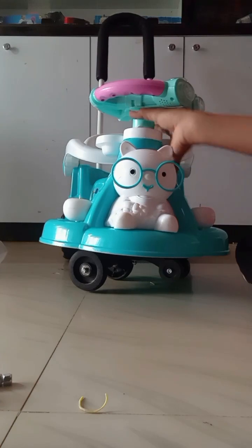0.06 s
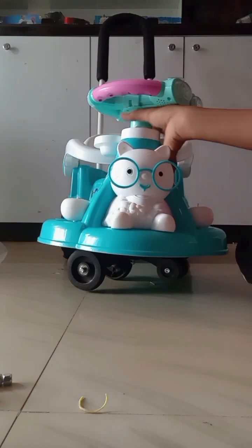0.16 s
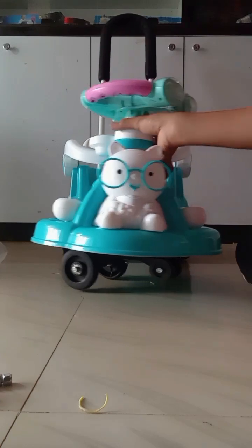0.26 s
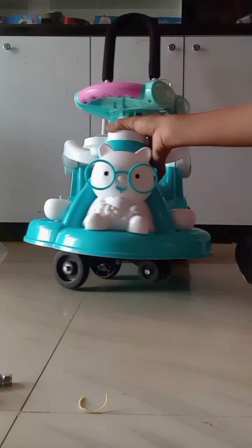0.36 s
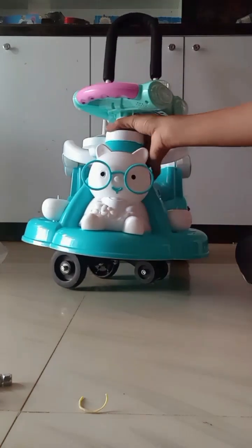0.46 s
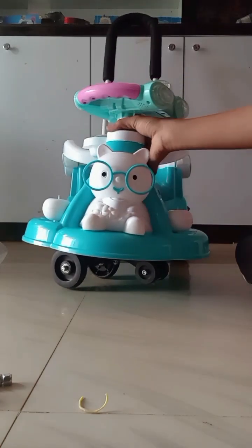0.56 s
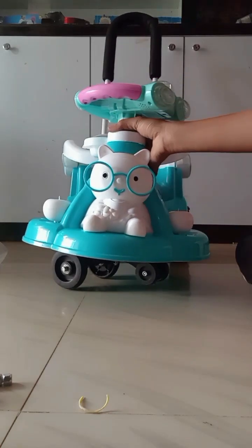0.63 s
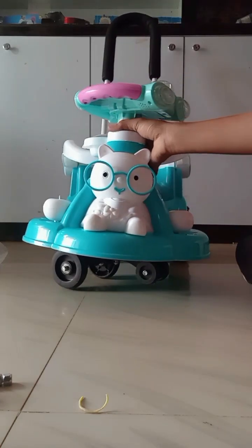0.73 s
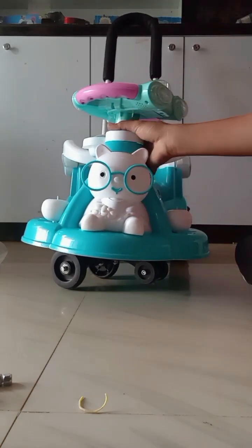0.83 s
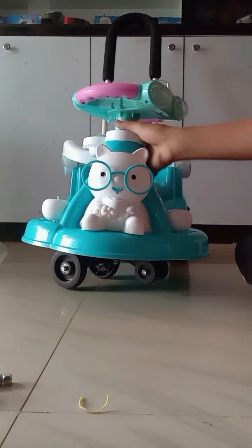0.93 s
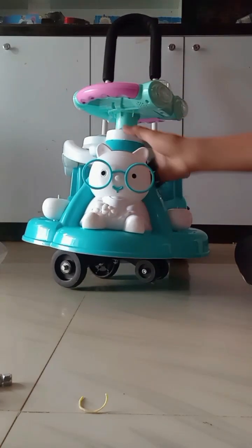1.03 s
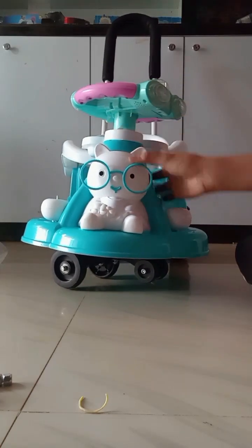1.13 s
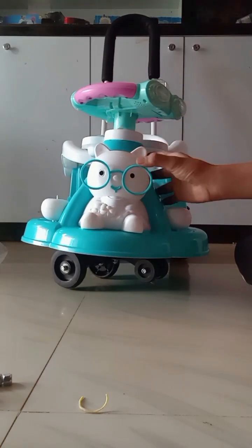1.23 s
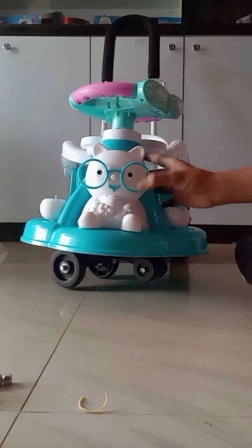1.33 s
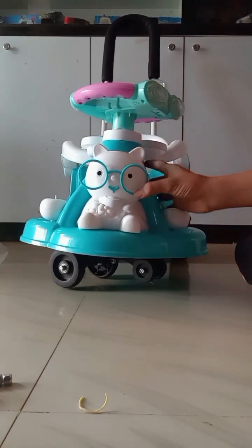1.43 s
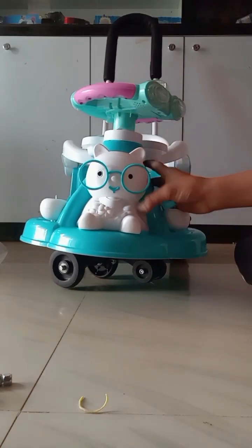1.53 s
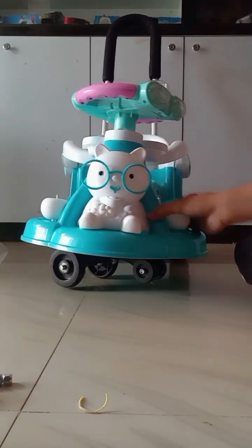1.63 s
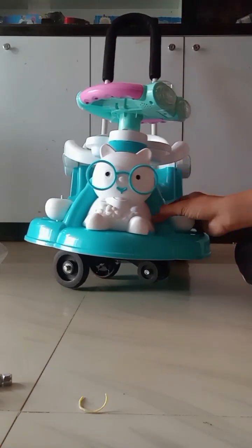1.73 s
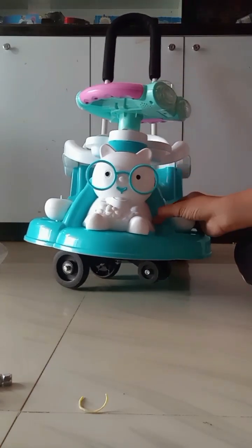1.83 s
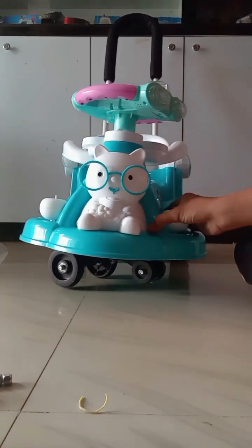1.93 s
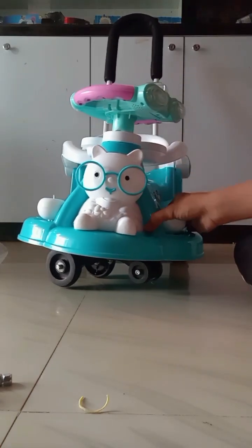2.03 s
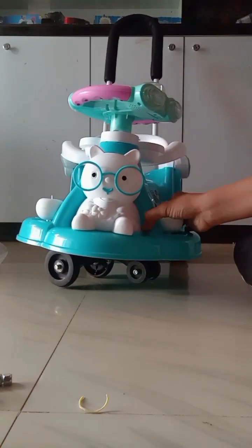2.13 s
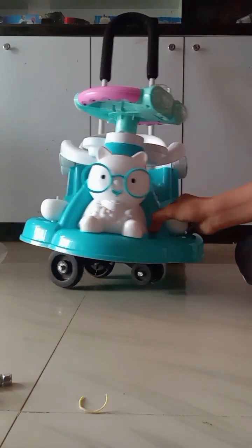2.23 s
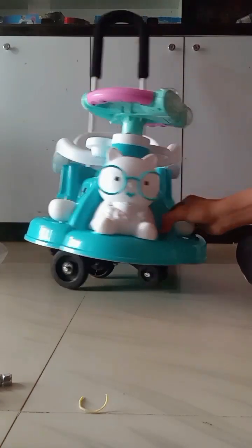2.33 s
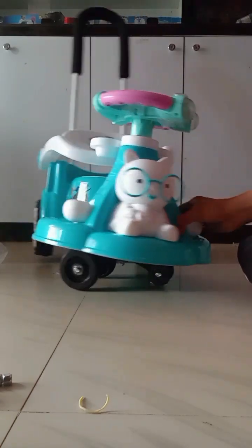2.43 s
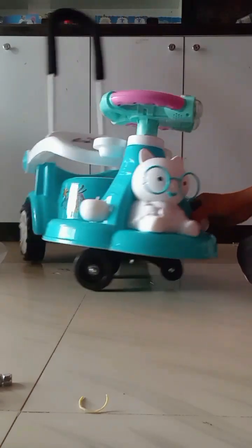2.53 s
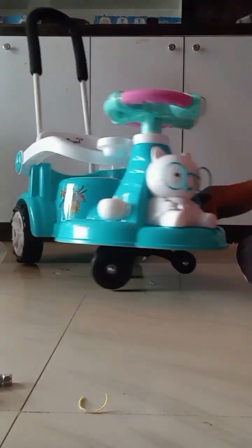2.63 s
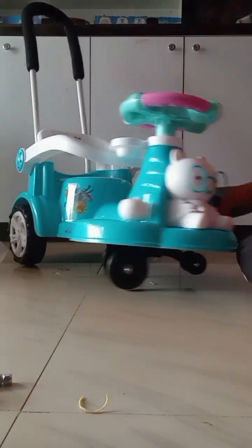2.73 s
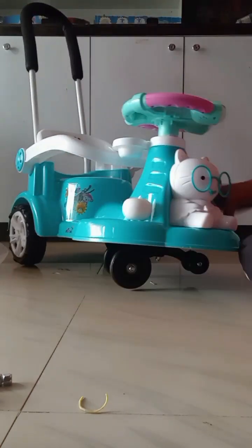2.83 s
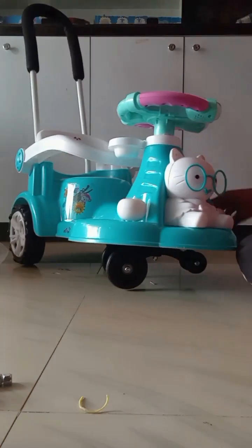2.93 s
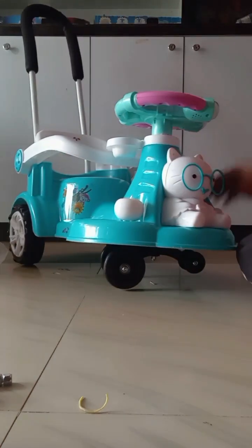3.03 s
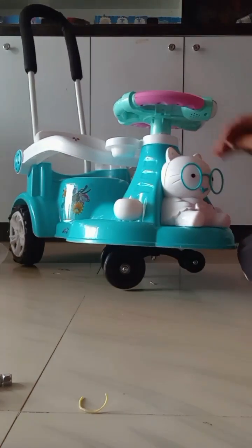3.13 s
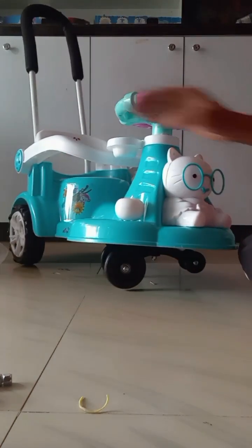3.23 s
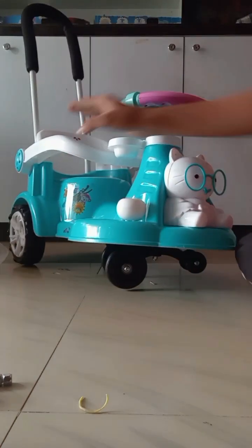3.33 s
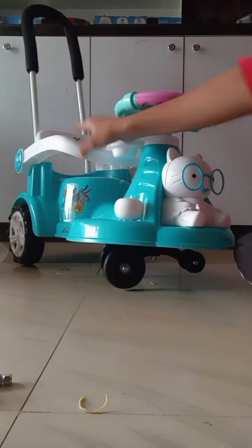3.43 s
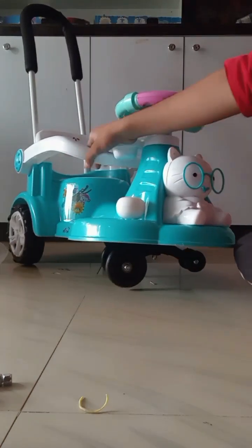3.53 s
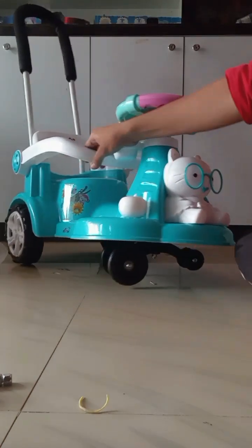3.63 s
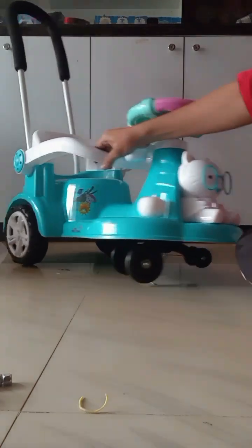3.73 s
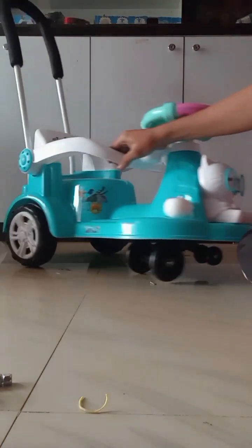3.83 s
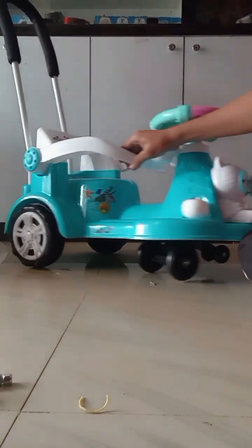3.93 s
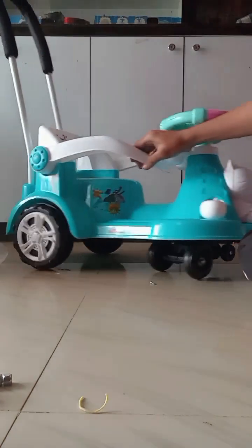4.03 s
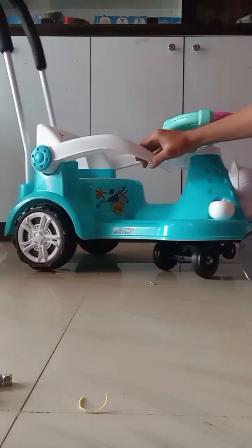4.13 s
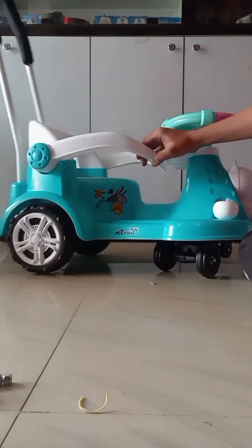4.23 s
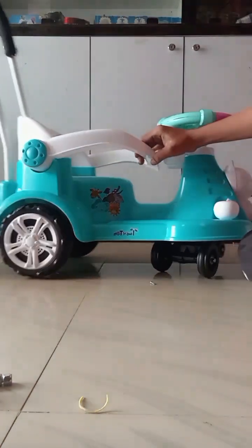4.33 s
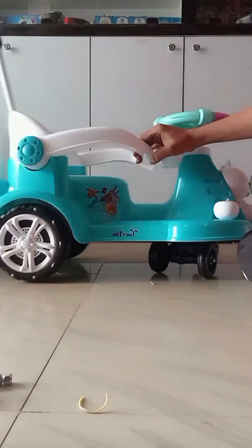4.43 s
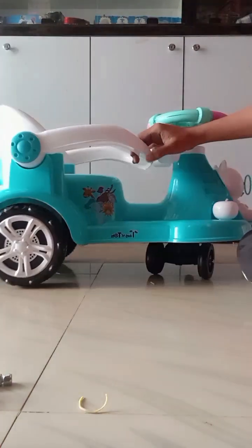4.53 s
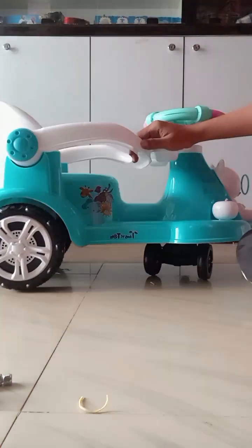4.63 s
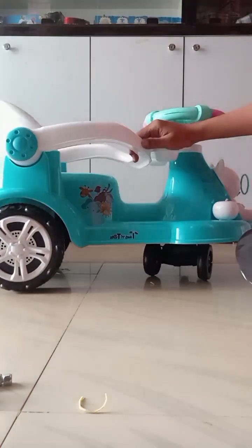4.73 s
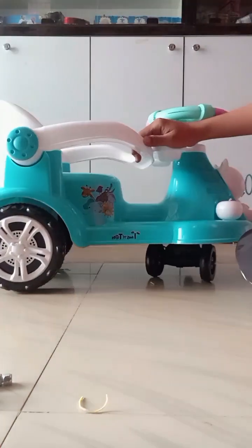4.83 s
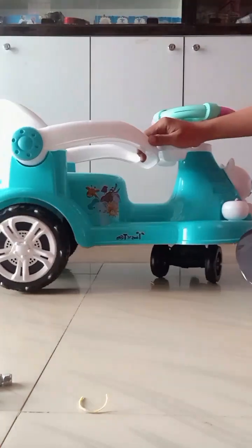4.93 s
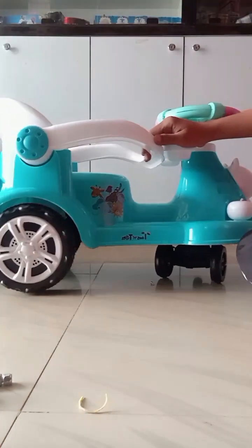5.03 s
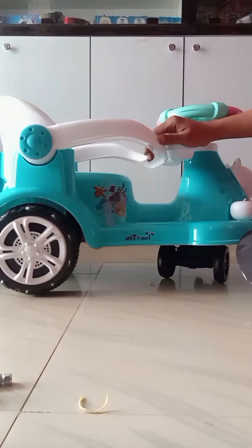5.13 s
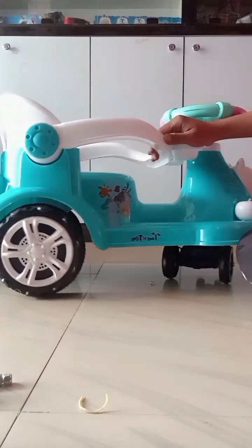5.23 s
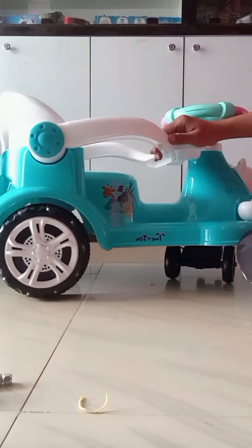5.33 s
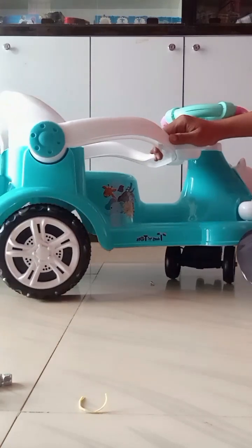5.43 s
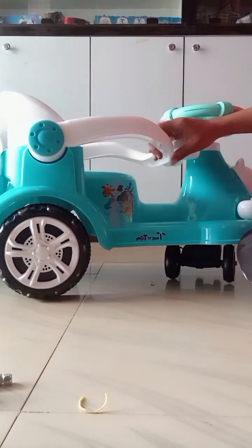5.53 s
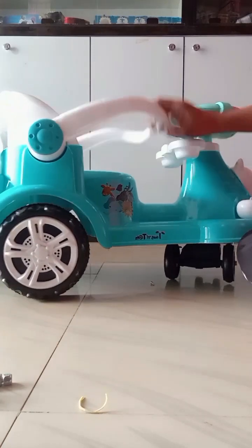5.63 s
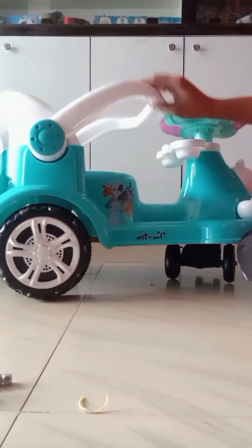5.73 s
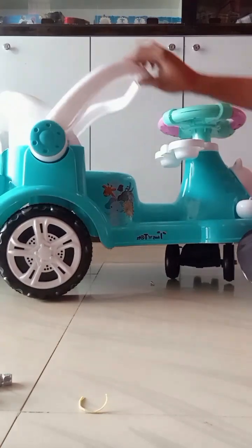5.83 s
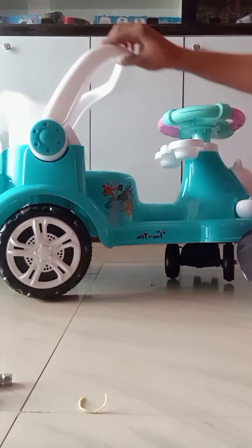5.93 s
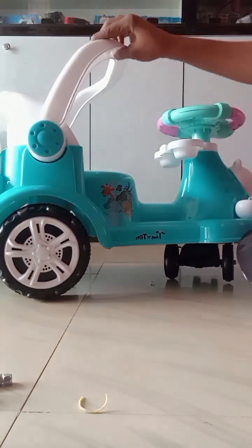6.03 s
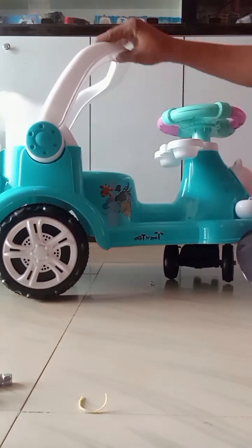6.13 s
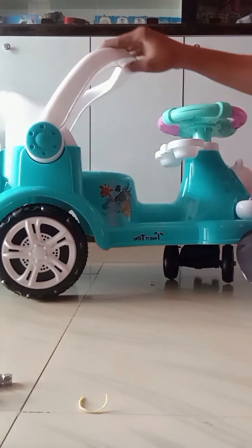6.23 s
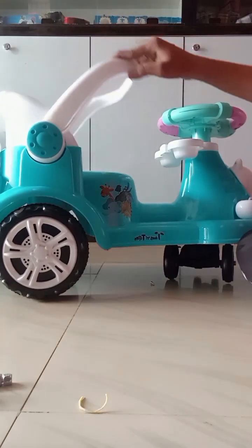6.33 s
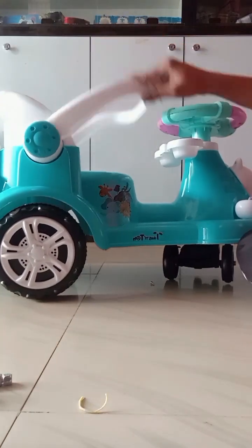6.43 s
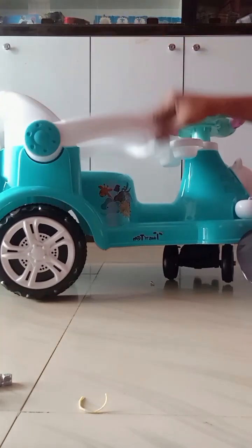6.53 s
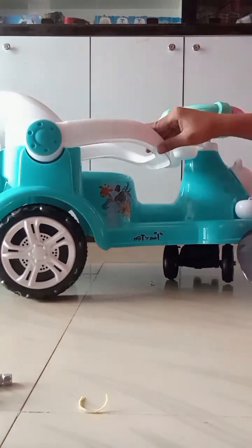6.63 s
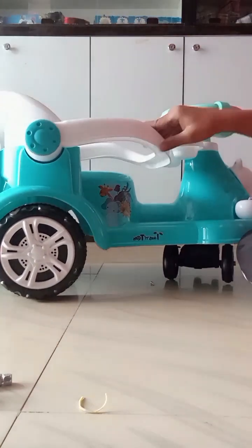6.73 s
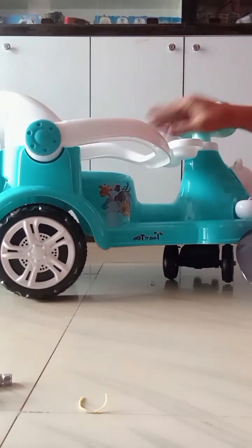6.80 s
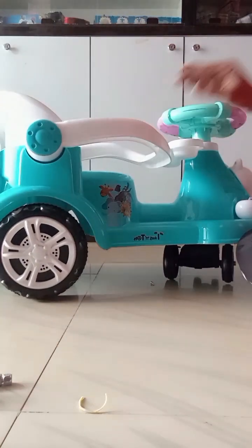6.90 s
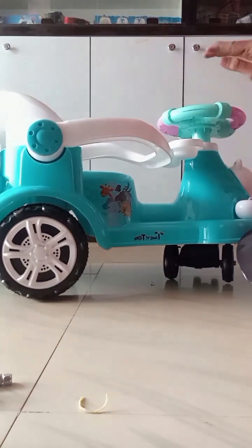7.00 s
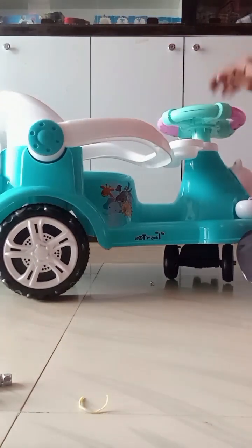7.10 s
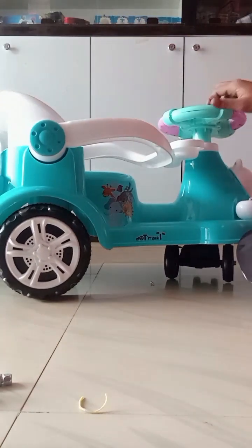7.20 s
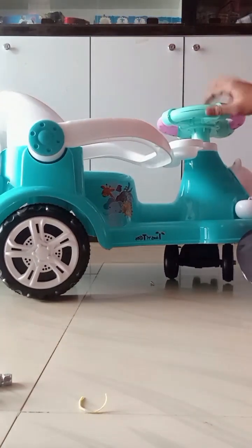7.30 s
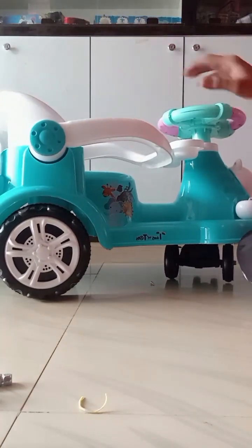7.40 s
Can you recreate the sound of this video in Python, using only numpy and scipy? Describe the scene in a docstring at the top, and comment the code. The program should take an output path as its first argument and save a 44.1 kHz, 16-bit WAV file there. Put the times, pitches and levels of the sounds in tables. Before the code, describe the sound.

Thin squeaks sound over a wavering low hum and rushing air in a small tiled room. The hard wheels of a hand-pushed plastic toy car start to roll with a fine gritty noise, marked by sharp knocks and dull hollow thumps. As the wheels slow and the hum weakens, a small microphone catches scattered plastic clicks, the side rail knocking as it is lifted and dropped, and a last few bumps.

```python
"""A steady rush of air, a low hum like a distant engine and two thin squeaks open the scene.
Then a plastic ride-on toy car is swung round and pushed by hand over a tiled floor in a small room.
Grit under its hard wheels rings their housing with a fine grain; the hollow shell shudders and thumps.
Loose joints click, and the wheels and the side rail, lifted and dropped, knock and ring a panel."""
import sys
import numpy as np
from scipy import signal
from scipy.fft import rfft, irfft
from scipy.io import wavfile

SR = 44100
rng = np.random.default_rng(int(sys.argv[2]) if len(sys.argv) > 2 else 0)


def output_pcm(signal):
    """Save a mono or channel-first signal as 16-bit PCM at the path in sys.argv[1].

    Samples are clipped to [-1, 1] before scaling.
    """
    pcm = np.clip(np.atleast_2d(signal).T, -1, 1) * 32767
    wavfile.write(sys.argv[1], SR, np.round(pcm).astype(np.int16))


N = 328986
TIME = np.arange(N) / SR


def gain_of(db):
    """Decibels to gain."""
    return 10 ** (np.asarray(db) / 20)


def unit_rms(x):
    """Scales to rms 1."""
    return x / np.sqrt(np.mean(x ** 2) + 1e-20)


def at_hz(rows, hz):
    """Reads a table between its points on a log frequency axis."""
    points_hz, values = np.transpose(rows)
    return np.interp(np.log(hz + 1), np.log(points_hz + 1), values)


def automation(rows, column=1):
    """One column of a timed table, ramped from point to point."""
    columns = np.transpose(rows)
    return np.interp(TIME, columns[0], columns[column])


def add(mix, start_s, sound):
    """Mixes a sound in at its start time."""
    part = mix[max(round(start_s * SR), 0):][:len(sound)]
    part += sound[:len(part)]


def drift(rate_hz):
    """Smooth random modulation of rms 1."""
    hz = np.fft.rfftfreq(N, 1 / SR)
    return unit_rms(irfft(rfft(rng.standard_normal(N)) * np.exp(-(hz / rate_hz) ** 2), N))


def swells(rows, attack_s, release_s):
    """Envelope of sounds that rise, hold and die away."""
    envelope = np.zeros(N)
    for start_s, hold_s, db in rows:
        rise = np.clip((TIME - start_s) / attack_s, 0, 1)
        fall = np.exp(-np.maximum(TIME - start_s - hold_s, 0) / release_s)
        envelope = np.maximum(envelope, gain_of(db) * rise * fall)
    return envelope


def bumps(per_s, spread_db, max_db):
    """Randomly timed impulses, most of them weak and a few stronger."""
    impulses = (rng.random(N) < per_s / SR) * rng.choice([-1, 1], N)
    return impulses * gain_of(np.minimum(spread_db * rng.exponential(1, N), max_db))


def reflected(x, delay_s=0.007, sway_s=0.000502, sway_hz=0.9, echo_db=-14):
    """Adds a reflection whose path slowly changes, so hollow peaks drift through the sound; rms 1."""
    delay = delay_s + sway_s * drift(sway_hz)
    return unit_rms(x + gain_of(echo_db) * np.interp(TIME - delay, TIME, x))


# Peaks and one notch shared by all noisy layers. Each row: centre in Hz, width in Hz, gain in dB.
EQ_BANDS = [(397, 16, 7.5), (1209, 270, 5.5), (2200, 22, 10), (2991, 190, 13), (5120, 980, -9),
            (5876, 420, 18), (8070, 290, 12.5)]

def colour(x, spectrum, tilt_db=0, size=4096):
    """Minimum-phase EQ of energy 1: a spectrum, a treble tilt and the shared resonances."""
    hz = np.fft.rfftfreq(size, 1 / SR)
    db = at_hz(spectrum, hz) + tilt_db * np.log2(1 + hz / 1000)
    db += sum(peak / (1 + (2 * (hz - centre) / width) ** 2) for centre, width, peak in EQ_BANDS)
    log_gain = np.log(gain_of(np.r_[db, db[-2:0:-1]]))
    response = np.exp(np.conj(signal.hilbert(log_gain)))
    taps = np.fft.ifft(response).real[:size // 2]
    return signal.oaconvolve(x, taps / np.linalg.norm(taps))[:len(x)]


def noise(spectrum):
    """Coloured noise of rms 1."""
    return unit_rms(colour(rng.standard_normal(N), spectrum))


# The small room's reverb. Each row: frequency in Hz, seconds to fall by 60 dB.
ROOM_DECAY = [(150, 0.4), (1000, 0.18), (3000, 0.17), (10000, 0.13)]

def room(x, size=256):
    """Tiles and cupboard doors return a short diffuse tail."""
    hz, t, spectra = signal.stft(rng.standard_normal(SR // 2), SR, nperseg=size)
    decay = gain_of(-60 * t / at_hz(ROOM_DECAY, hz)[:, None])
    tail = signal.istft(spectra * decay, SR, nperseg=size)[1]
    tail[:SR // 200] = 0  # 5 ms of pre-delay
    return signal.fftconvolve(x, tail / np.linalg.norm(tail))[:N]


# EQ curves of the four air layers. Each row: frequency in Hz, relative level in dB.
RUSH_EQ = [(150, -31.5), (400, -12), (550, -5.5), (880, -5), (1050, -3.5), (1380, -2.5), (1570, -11.5),
           (2000, -19.5), (2650, -24), (3500, -27), (4800, -39), (7200, -51.5), (9300, -41.5),
           (12000, -57.5), (15000, -58.5)]
BODY_EQ = [(70, -5), (140, 1.5), (220, -2.5), (310, -2), (420, -9.5), (560, -14), (1000, -29), (3000, -87)]
RUMBLE_EQ = [(20, -17), (32, -30.5), (45, -23), (58, -21), (70, 17.5), (88, -8.5), (120, -3), (180, -12),
             (260, -28.5), (400, -58), (2000, -100)]
HISS_EQ = [(1000, -13.5), (3000, 10.5), (5000, -4.5), (7200, -23.5), (9200, -2.5), (11500, -18.5),
           (13200, -16), (15000, -11.5)]
# Fader moves of the air. Each row: time in seconds, rush and body levels in dB before trim.
AIR_FADERS = [(0, -32, -36.5), (1.2, -31, -34.5), (1.75, -29.5, -30.5), (2.9, -31.5, -30), (4.4, -34, -33),
              (5.1, -37.5, -37), (6.55, -36.5, -39), (7.4, -37.5, -41)]
# Fader moves of the rumble. Each row: time in seconds, level in dB before trim.
RUMBLE_FADER = [(0, -31.5), (2.2, -30), (2.8, -29.5), (4.1, -31), (4.3, -35), (4.9, -37.5), (6.1, -47),
                (6.4, -41.5), (7.4, -37)]

def air(rush_trim_db=-0.4, body_trim_db=0.58, rumble_trim_db=-1.5, hiss_db=-68):
    """The room's fluttering rush, a low body and a rumble that swell at random, and a faint hiss."""
    rush = reflected(noise(RUSH_EQ))
    rush *= gain_of(automation(AIR_FADERS) + rush_trim_db + 1.62 * drift(rate_hz=31))
    body = noise(BODY_EQ)
    body *= gain_of(automation(AIR_FADERS, column=2) + body_trim_db + 1.55 * drift(rate_hz=9.6))
    rumble = noise(RUMBLE_EQ)
    rumble *= gain_of(automation(RUMBLE_FADER) + rumble_trim_db - 0.5 * drift(rate_hz=8.4))
    return rush + body + rumble + gain_of(hiss_db) * noise(HISS_EQ)


# The hum's pitch line. Each row: time in seconds, pitch in Hz.
HUM_GLIDE = [(0, 117.7), (1.3, 118), (1.9, 119.3), (3.0, 116.8), (4.5, 116.3), (6.1, 115.3), (6.5, 119)]
# Fader moves of the hum. Each row: time in seconds, level in dB before trim.
HUM_FADER = [(0.0, -18.5), (0.96, -33.5), (1.04, -19.5), (1.34, -15.5), (2.65, -19.5), (2.78, -27),
             (3.05, -13.5), (3.29, -19.5), (3.49, -12), (3.57, -20.5), (3.77, -11), (4.03, -23.5),
             (4.15, -16), (4.25, -32.5), (4.39, -16), (4.57, -32), (4.73, -23), (5.69, -36), (5.81, -18.5),
             (6.19, -32.5), (6.52, -24.5), (6.74, -58), (6.84, -32), (7.2, -49)]
# Its octave comes out for a while. Each row: start in seconds, hold in seconds, level in dB.
HUM_OCTAVE = [(1.8, 0.97, -35)]

def hum(trim_db=-1.5, waver_db=1.74, waver_hz=14, wander_hz=0.4, beat_db=-37, beat_hz=14):
    """A nearly pure low tone that sags in pitch, wavers, and beats unevenly where it is weak."""
    pitch_hz = automation(HUM_GLIDE) + wander_hz * drift(rate_hz=7.2)
    phase = 2 * np.pi * np.cumsum(pitch_hz) / SR
    tone = gain_of(automation(HUM_FADER) + trim_db + waver_db * drift(waver_hz)) * np.sin(phase)
    # a narrow band of noise around the tone beats against it
    band = drift(beat_hz) * np.sin(phase) + drift(beat_hz) * np.cos(phase)
    octave = swells(HUM_OCTAVE, attack_s=0.14, release_s=0.15) * np.sin(2 * phase)
    return np.sqrt(2) * (tone + octave) + gain_of(beat_db) * band


# A short high chirp, then a lower squeal in three surges.
# Each row: start in seconds, hold in seconds, level in dB before trim.
CHIRP_SURGES = [(.042, .13, -43.5)]
SQUEAL_SURGES = [(1.398, 0.19, -31), (1.665, 0.22, -32), (2.0, 0.12, -41.5)]
# Their tone clusters. Each row: frequency in Hz, relative level in dB.
CHIRP_TONES = [(3031, -64), (3235, -58), (3680, -53.5), (4055, -52)]
SQUEAL_TONES = [(2800, -6), (2860, -14.5), (2940, -5), (3030, -9), (3180, -7.5), (3316, 0), (3370, -6),
                (3436, -16.5), (3741, -12.5)]

def squeak(surges, tones, attack_s, release_s, jitter_hz, flutter_db, trim_db, edge_db, scoop_hz):
    """A cluster of shrill tones that scoop up into pitch, with a faint edge of overtones."""
    cluster = np.zeros(N)
    flat_hz = scoop_hz * np.exp(-np.maximum(TIME - surges[0][0], 0) / 0.016)
    for hz, db in tones:
        phase = 2 * np.pi * np.cumsum(hz - flat_hz + jitter_hz * drift(rate_hz=195)) / SR
        cluster += gain_of(db + flutter_db * drift(rate_hz=45)) * np.sin(phase)
    cluster = unit_rms(cluster)
    edge = gain_of(edge_db) * np.tanh(6 * cluster)  # squared-off peaks carry the odd overtones
    return (cluster + edge) * swells(surges, attack_s, release_s) * gain_of(trim_db)


# The car is swung round, then rolls on slowly. Each row: time in seconds, level in dB.
ROLL_FADER = [(0, -55.5), (2.15, -44), (2.32, -31), (2.8, -23.5), (3.05, -29.5), (3.6, -36), (4.8, -40.5),
              (7.4, -61)]
# Tone of the wheels and their housing. Each row: frequency in Hz, relative level in dB.
WHEEL_EQ = [(100, -11), (290, 0.5), (520, -10), (630, -5.5), (690, 4.5), (770, -4), (880, -17), (990, -0.5),
            (1350, 0), (1800, -16), (2600, -28.5), (4500, -43.5), (9000, -54), (15000, -56)]

def wheels():
    """Hard wheels meet grit on the tiles; each tiny bump rings the wheel housing."""
    grit = bumps(per_s=900, spread_db=1, max_db=4)
    return gain_of(automation(ROLL_FADER)) * reflected(colour(grit, WHEEL_EQ))


# The shell shudders as the car is dragged round and as the rail swings down.
# Each row: start in seconds, hold in seconds, level in dB.
SHUDDER_CUES = [(3.4, 0.39, -39), (3.93, 0.053, -23.5), (4.1, .8, -42), (6.3, 0.3, -28.5)]
# The shell's low boom. Each row: frequency in Hz, relative level in dB.
BOOM_EQ = [(30, -28), (55, -10.5), (80, 7), (130, -2), (185, -2.5), (250, -19), (340, -11.5), (500, -42),
           (2000, -100)]

def shudder():
    """Uneven slips of the pushed plastic set the big shell booming."""
    slips = bumps(per_s=160, spread_db=6, max_db=18)
    return swells(SHUDDER_CUES, attack_s=0.021, release_s=0.026) * unit_rms(colour(slips, BOOM_EQ))


def damped_mode(db, hz, attack_s):
    """One heavily damped mode swells to its peak and dies within a few cycles."""
    t = np.arange(SR // 4) / SR
    envelope = t / attack_s * np.exp(1 - t / attack_s)
    return gain_of(db) * envelope * np.sin(2 * np.pi * hz * t)


# Dull hits on the body. Each row: start in seconds, peak in dB, pitch in Hz, attack in seconds.
THUMP_CUES = [(2.695, -19.5, 305, 0.0055), (3.494, -21, 204, .007), (3.65, -19.5, 192, 0.0034),
              (3.808, -20, 174, 0.0065), (3.947, -19, 190, 0.0035), (3.965, -13.5, 247, 0.0025),
              (3.987, -7.5, 109, 0.0033), (4.53, -15.5, 252, 0.0037), (5.396, -11.5, 137, 0.0015),
              (6.667, -18.5, 296, 0.006), (7.343, -11.5, 126, 0.0032), (7.351, -13.5, 203, 0.0028)]

def thumps():
    """Soft blows move the hollow body without a snap."""
    out = np.zeros(N)
    for start_s, db, hz, attack_s in THUMP_CUES:
        add(out, start_s, damped_mode(db, hz, attack_s))
    return out


# Tone of the hollow plastic shell. Each row: frequency in Hz, relative level in dB.
SHELL_EQ = [(100, -9), (280, -1), (500, -2), (1000, 4), (1400, 0.5), (1800, -5.5), (2600, -17), (3800, -20),
            (5000, -32), (7200, -45.5), (9500, -45.5), (12000, -55), (15000, -50.5)]

def snap(db, decay_s, tilt_db, attack_s=0.0008):
    """Plastic parts chatter briefly against each other and sound the shell."""
    t = np.arange(SR // 4) / SR
    burst = rng.standard_normal(len(t)) * np.minimum(t / attack_s, 1) * np.exp(-t / decay_s)
    return gain_of(db) * colour(burst, SHELL_EQ, tilt_db)


# Small plastic clicks.
# Each row: start in seconds, level in dB, decay in seconds, treble tilt in dB per octave.
CLICK_CUES = [(0.076, -28.5, 0.011, -1.5), (1.108, -21, 0.013, -6.5), (2.975, -34, 0.0066, 9.5),
              (3.296, -26, 0.0028, -2), (3.982, -29, 0.0035, -1), (4.4, -28, 0.028, -12),
              (4.494, -34, 0.059, 2), (5.589, -24.5, 0.0042, -.5), (5.667, -30.5, .0025, 9.5),
              (6.038, -28, 0.0078, -6.5), (6.512, -28, 0.0074, -6), (7.39, -34.5, 0.019, 3)]

def clicks():
    """Loose joints snap as the toy is handled."""
    out = np.zeros(N)
    for start_s, db, decay_s, tilt_db in CLICK_CUES:
        add(out, start_s, snap(db, decay_s, tilt_db))
    return out


# Hard hits of the wheels and the rail, some with bounces. Each row: start in seconds, ring level in dB,
# ring pitch in Hz, snap level in dB, snap decay in seconds, snap treble tilt in dB per octave.
KNOCK_CUES = [(2.69, -11.5, 993, -17, 0.0099, 3), (2.699, -9, 936, -17.5, 0.011, 4),
              (2.955, -3.5, 1186, -16.5, 0.0075, 5.5), (4.936, -20, 1226, -23, 0.0099, 2),
              (5.719, -19.5, 1265, -31, 0.0075, 6), (5.728, -19.5, 1260, -23, .01, 5.5),
              (6.648, -23, 1340, -21.5, 0.0054, 7), (6.662, -18.5, 1180, -19.5, 0.0099, 0),
              (6.67, -12, 1104, -19.5, 0.013, -9), (6.69, -21.5, 1060, -39, .01, 7),
              (7.251, -27, 1100, -26.5, 0.021, 2.5), (7.305, -19, 1046, -39, .008, 6)]
# Modes of a struck panel. Each row: multiple of the pitch, relative level in dB, attack in seconds.
PANEL_RING = [(0.522, -15, 0.0042), (0.998, 0.5, 0.0017), (1.32, -16, .002), (1.9, -21, 0.0022)]

def knocks(ring_delay_s=0.00204):
    """Each hard blow snaps at the contact, then rings a panel."""
    out = np.zeros(N)
    for start_s, ring_db, hz, snap_db, decay_s, tilt_db in KNOCK_CUES:
        add(out, start_s, snap(snap_db, decay_s, tilt_db))
        for multiple, mode_db, attack_s in PANEL_RING:
            add(out, start_s + ring_delay_s, damped_mode(ring_db + mode_db, multiple * hz, attack_s))
    return out


def scene(click_send_db=-6, knock_send_db=-9, thump_send_db=-13, squeak_send_db=-7):
    """The toy and the squeaks over a bed of hum and air; hits and squeaks feed the reverb."""
    snaps, blows, thuds = clicks(), knocks(), thumps()
    squeaks = squeak(CHIRP_SURGES, CHIRP_TONES, attack_s=0.0095, release_s=0.07, jitter_hz=26,
                     flutter_db=5, trim_db=-3, edge_db=-14, scoop_hz=217.5)
    squeaks += squeak(SQUEAL_SURGES, SQUEAL_TONES, attack_s=0.014, release_s=0.057, jitter_hz=33.2,
                      flutter_db=5.5, trim_db=-2, edge_db=-21, scoop_hz=61.1)
    reverb = room(gain_of(click_send_db) * snaps + gain_of(knock_send_db) * blows
                  + gain_of(thump_send_db) * thuds + gain_of(squeak_send_db) * squeaks)
    bed = hum() + air()
    car = wheels() + shudder() + thuds + snaps + blows
    return (bed + squeaks + car + reverb)[None]


def record(dry, low_cut_hz=42, high_cut_hz=15550):
    """A small microphone loses the deepest bass; a steep filter takes off the top treble."""
    low_cut = signal.butter(2, low_cut_hz, "highpass", fs=SR, output="sos")
    high_cut = signal.firwin(511, high_cut_hz, window=("kaiser", 9), fs=SR)
    return signal.oaconvolve(signal.sosfilt(low_cut, dry), high_cut[None], "same")


dry = scene()
out = record(dry)
output_pcm(out)
```